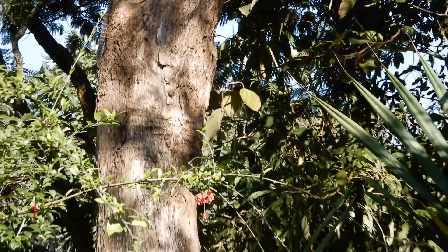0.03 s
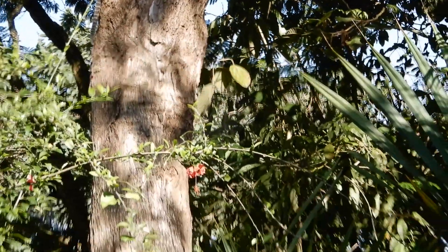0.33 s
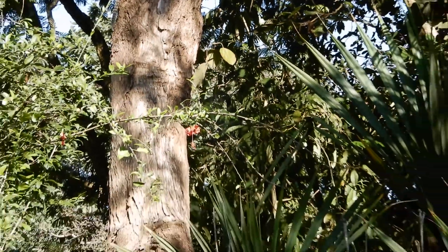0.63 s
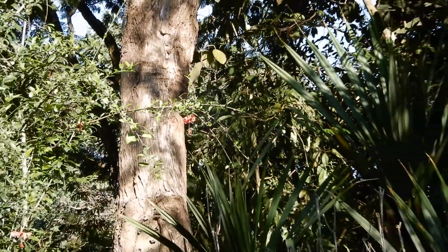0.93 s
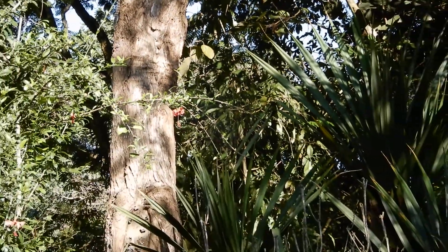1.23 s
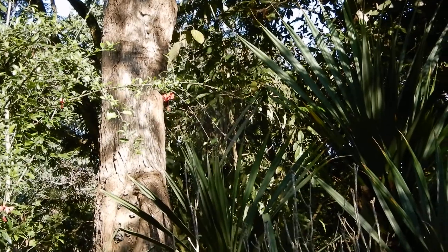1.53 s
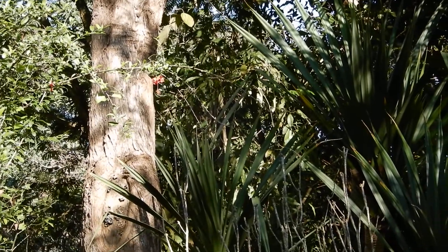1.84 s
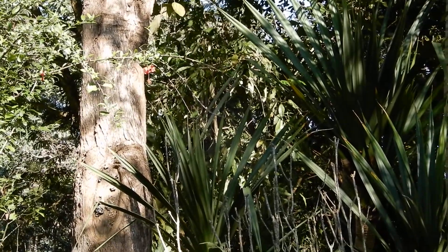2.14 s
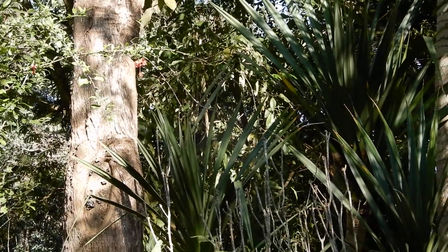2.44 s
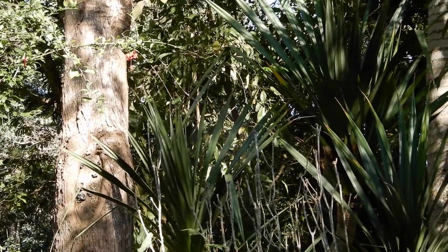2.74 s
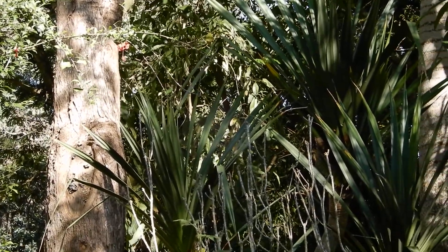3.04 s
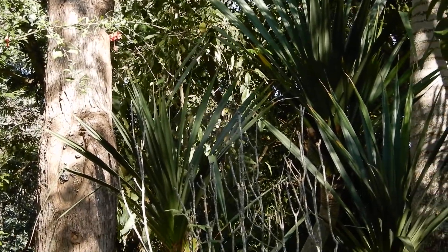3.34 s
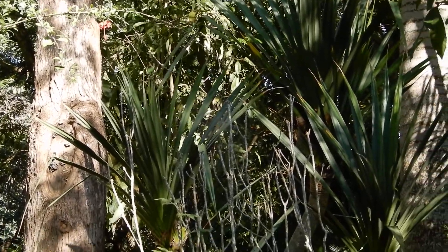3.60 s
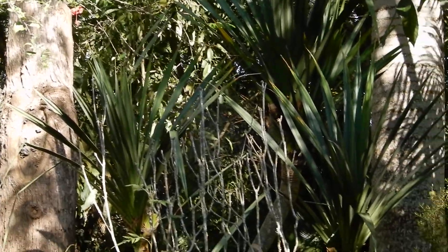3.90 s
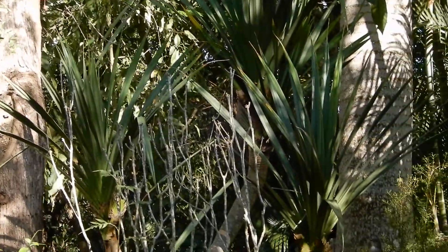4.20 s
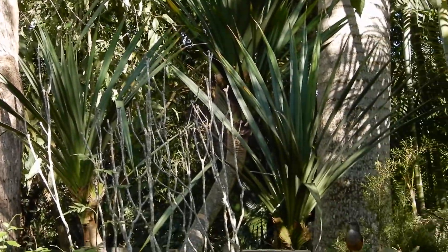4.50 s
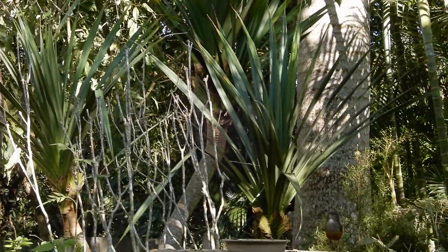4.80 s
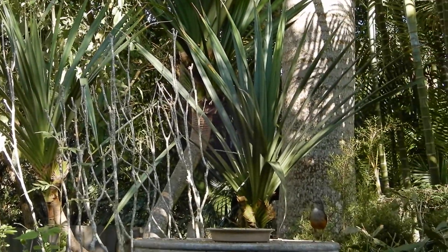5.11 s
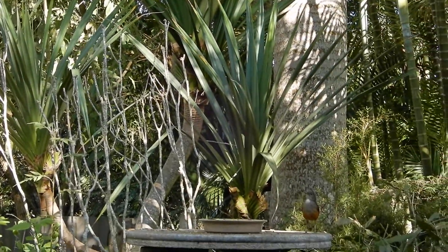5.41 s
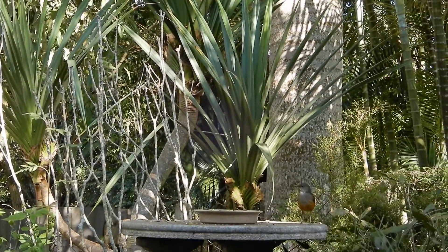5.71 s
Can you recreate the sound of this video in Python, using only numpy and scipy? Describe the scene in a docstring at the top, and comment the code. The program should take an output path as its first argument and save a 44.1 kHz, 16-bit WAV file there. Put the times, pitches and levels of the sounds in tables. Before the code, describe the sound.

Light microphone bumps, then a bird squawks harshly once and later twice, with thin far whistles and soft hoots between.

```python
"""A bird close by, hidden in a leafy garden, gives two soft buzzy notes and three harsh squawks: its
syrinx, forced into a rasp, settles into a falling whistle. Thin wavering whistles and a few low hoots
come from farther off, over a distant rumble and a soft hiss. Early on a hand rubs and knocks the
housing of the stereo microphone."""
import sys
import numpy as np
from scipy import signal
from scipy.fft import rfft, irfft, next_fast_len
from scipy.io import wavfile
from scipy.ndimage import uniform_filter1d, minimum_filter1d

SR = 44100
rng = np.random.default_rng(int(sys.argv[2]) if len(sys.argv) > 2 else 0)


def generate_wav(signal):
    """Clip the signal to [-1, 1] and save it as 16-bit WAV at the path in sys.argv[1]."""
    frames = np.transpose(np.atleast_2d(signal))
    scaled = np.clip(frames, -1, 1) * 32767
    pcm = np.round(scaled).astype(np.int16)
    wavfile.write(sys.argv[1], SR, pcm)


N = 253575
TIME = np.arange(N) / SR

# How alike noise is on the two channels. Each row: frequency in Hz, left-right correlation.
CORRELATION = [(30, 1), (120, 0.84), (1000, 0.83), (2500, 0.72), (5000, 0.78), (12000, 0.13)]
# Lean of background and handling, and of the near bird. Each row: frequency in Hz, left minus right in dB.
NOISE_BALANCE = [(60, -2.5), (130, -2.5), (300, -1.5), (1000, -0.5), (4000, -0.5), (15000, 1.5)]
BIRD_BALANCE = [(2000, -2), (5000, 0.3), (8200, 4.5), (12000, -3.5)]
# Spectra of the noises. Each row: frequency in Hz, relative level in dB.
RUMBLE_COLOUR = [(25, -10), (45, -11.5), (70, 0.5), (100, 3), (170, -5.5), (300, -5), (500, -12),
                 (760, -19), (1000, -15.5), (1350, -30), (2500, -24), (4400, -25.5), (7000, -33.5),
                 (15500, -55.5)]
HISS_COLOUR = [(1600, -9), (2400, -5.5), (3300, -8), (4800, -4), (6500, -3), (9200, -4), (10200, -44),
               (16000, -38.5)]
TICK_COLOUR = [(400, -9), (1400, -17), (2800, 2), (4000, -5.5), (8000, -12), (12000, -15), (16000, -30)]
RUB_COLOUR = [(1300, -21), (2700, -8), (3300, -17), (3700, 5.5), (4200, -15), (6000, -25), (8500, -14),
              (10500, -19), (13000, -27.5), (14200, -28), (16000, -43)]
SCUFF_COLOUR = [(60, -14), (130, 4), (300, 0.5), (600, -13.5), (900, -5.5), (1300, -23.5), (2700, -12.5),
                (4500, -22.5), (9000, -26.5), (15000, -43)]
# The hiss between swells. Each row: time in seconds, relative level in dB.
HISS_FLOOR = [(0, -78), (3.4, -74.5), (4.7, -63), (5.75, -67)]
# Swells of soft high hiss. Each row: start in seconds, length in seconds, relative level in dB.
HISS_SWELLS = [(-.3, 0.63, -57.5), (3.556, 0.4, -61.5), (3.856, 0.52, -56), (4.31, 0.37, -57),
               (4.68, 0.14, -59.5)]
# Specks of sound in the foliage. Each row: start in seconds, level in dB.
LEAF_SPECKS = [(1.282, -52.5), (4.46, -61), (4.53, -59), (5.042, -55)]
# Light strokes and heavier scuffs of the hand on the microphone.
# Each row: start in seconds, length in seconds, relative level in dB.
RUBS = [(-.02, 0.23, -57), (0.421, .75, -54), (1.487, .14, -53)]
SCUFFS = [(0.42, .14, -44), (1.135, 0.041, -45.5), (1.512, 0.092, -44)]
# Knocks on the housing. Each row: start in seconds, thump level in dB, thump pitch in Hz,
# tick level in dB, tick length in seconds.
KNOCKS = [(0.059, -29, 160, -53, 0.0052), (0.724, -25.5, 170, -34.5, 0.0063),
          (0.9883, -21.5, 146, -34.5, 0.012), (1.0373, -31.5, 420, -37.5, 0.0068)]
# The garden's echo. Each row: frequency in Hz, seconds to die away by 60 dB.
GARDEN_T60 = [(500, 0.33), (2000, 0.2), (4200, 0.35), (8000, 0.25), (15000, 0.088)]
# Stereo width of that echo. Each row: frequency in Hz, side minus mid in dB.
ECHO_WIDTH = [(500, 7), (2500, -12), (4500, -11.5), (8000, -1.5), (14000, 5.5)]
# Far calls. Each row: start in seconds, length in seconds, middle pitch in Hz, relative level in dB.
FAR_HOOTS = [(3.82, 0.093, 545, -56.5), (3.93, 0.092, 573, -54), (4.33, .096, 530, -57.5),
             (4.62, .11, 579, -51.5)]
FAR_WHISTLES = [(1.54, .09, 4160, -52.5), (1.63, .09, 4070, -51.5), (1.74, 0.068, 4390, -51.5),
                (1.80, 0.065, 4060, -46), (1.93, 0.095, 4215, -52), (2.04, 0.075, 4050, -50.5),
                (3.36, .11, 4105, -49), (3.62, 0.08, 4300, -56.5), (3.92, 0.097, 4295, -53),
                (3.99, 0.071, 4030, -49), (4.24, 0.071, 4040, -46.5), (4.44, 0.095, 4175, -47),
                (4.54, 0.08, 4000, -48), (4.69, 0.057, 3940, -45)]
# Resonances of the near bird's throat and beak. Each row: centre in Hz, width in Hz, relative level in dB.
THROAT = [(970, 210, -30), (2270, 290, -14.5), (3110, 594, -5), (4210, 830, -2), (5250, 820, 1),
          (6330, 1180, -7), (7960, 1570, -20.5), (10600, 1500, -31.5), (12760, 1100, -33.5),
          (14300, 1500, -43)]
# Its voice cracks. Each row: start in seconds, length in seconds, lowest pitch in Hz, relative level in dB.
CRACKS = [(2.423, 0.016, 2120, -31), (2.463, 0.0098, 2206, -28), (2.485, 0.0057, 2510, -20.5),
          (2.537, 0.0093, 2560, -23.5), (5.397, 0.0072, 2240, -28), (5.422, 0.0088, 2090, -27.5),
          (5.445, 0.0057, 2240, -23.5), (5.496, 0.014, 2387, -29.5)]
# The rasp breaks back into the whistle. Each row: start in seconds, length in seconds, added rasp share.
RELAPSES = [(2.464, .028, 0.39), (5.224, .012, 0.23), (5.419, 0.016, 1), (5.438, 0.02, 0.43)]
# The bird pushes harder for a moment. Each row: start in seconds, length in seconds, extra level in dB.
PUSHES = [(2.293, .008, 5.5), (2.488, 0.014, 4), (2.51, .013, 4), (5.209, .016, 4), (5.234, 0.0073, 8.5),
          (5.283, 0.011, 2.5), (5.408, .012, 5), (5.492, 0.021, 6)]
# The near bird's calls. Each row: start in seconds, length in seconds, relative level in dB, attack in
# seconds, sag of level in dB, opening pitch in Hz, fall in Hz, seconds of rasp, rasp share left (0-1),
# opening chaos (0-1), seconds until full chaos, cycles before the pattern repeats, second and third
# partials in dB, tilt of the rasp in dB per octave.
SQUAWKS = [(2.237, .104, -39.5, .016, -6, 4260, 130, 0.051, 0.07, 0.2, .15, 2, -24.5, -33, -4.5),
           (2.339, .05, -37, 0.0034, -0.5, 4240, 200, .018, 0.4, .6, 0.022, 2, -24, -26, -6.5),
           (2.393, 0.16, -11.5, 0.013, 3, 4312, 419.5, 0.058, 0.02, .26, .055, 4, -25.5, -48, 0.5),
           (5.147, .17, -17.5, 0.065, 3, 4304, 370.5, .06, .06, .8, 0.031, 4, -31, -29.5, 2.5),
           (5.353, 0.15, -10.5, 0.035, 9, 4246, 419.5, 0.058, 0.11, 0.79, 0.028, 4, -19.5, -32, 1.5)]


def from_db(db):
    """Decibels to gain."""
    return 10 ** (np.asarray(db) / 20)


def rms_one(x):
    """Scale to unit power."""
    return x / np.sqrt(np.mean(x ** 2) + 1e-20)


def at_hz(points, hz):
    """Read a curve on a log-frequency axis."""
    f, value = np.transpose(points)
    return np.interp(np.log(np.maximum(hz, 1)), np.log(f), value)


def colour(x, gain):
    """Filter by a gain that is a function of frequency."""
    size = next_fast_len(N + 4096)
    hz = np.arange(size // 2 + 1) * SR / size
    return irfft(rfft(x, size) * gain(hz), size)[..., :N]


def panned(x, balance):
    """Lean a sound left or right, band by band."""
    return colour(x, lambda f: from_db(at_hz(balance, f) * np.array([[.5], [-.5]])))


def drift(rate):
    """Random wander of rms 1, with `rate` new values a second."""
    knots = rng.standard_normal(N // 16)
    return rms_one(np.interp(TIME * rate, np.arange(len(knots)), knots))


def stereo_noise(spectrum):
    """Coloured noise of rms 1, more alike on both channels in the bass."""
    mid, side = rng.standard_normal((2, N))
    mid = colour(mid, lambda f: np.sqrt(1 + at_hz(CORRELATION, f)))
    side = colour(side, lambda f: np.sqrt(1 - at_hz(CORRELATION, f)))
    pair = np.array([mid + side, mid - side])
    return rms_one(colour(pair, lambda f: from_db(at_hz(spectrum, f))))


def swell(start, length):
    """A rounded rise and fall."""
    return np.sqrt(np.sin(np.pi * np.clip((TIME - start) / length, 0, 1)).clip(0))


def plateau(start, length, edge_s):
    """Rise, hold and fall, with straight edges."""
    return np.clip(np.minimum(TIME - start, start + length - TIME) / edge_s, 0, 1)


def swells_within(rows, start, end):
    """Sum of the brief swells that begin during a call."""
    return sum(size * swell(s, length) for s, length, size in rows if start < s < end)


def phase_of(hz):
    """Running phase of an oscillator."""
    return 2 * np.pi * np.cumsum(hz) / SR


def background(rumble_db=-47.5, hiss_db=-1, rustle_db=1.5, speck_s=0.0035):
    """Distant rumble, with a soft uneven hiss and a few specks from the leaves."""
    rumble = from_db(rumble_db) * stereo_noise(RUMBLE_COLOUR)
    swells = sum(from_db(db) * swell(s, length) for s, length, db in HISS_SWELLS)
    floor = from_db(np.interp(TIME, *np.transpose(HISS_FLOOR)))
    rustle = from_db(hiss_db + rustle_db * (drift(30) + drift(300)))
    hiss = np.maximum(swells, floor) * rustle * stereo_noise(HISS_COLOUR)
    specks = sum(from_db(db) * swell(s, speck_s) for s, db in LEAF_SPECKS)
    return rumble + hiss + specks * stereo_noise(TICK_COLOUR)


def hand_rubs(edge_s=0.018, grip_db=-67, let_go_s=1.62, grain_db=1.14):
    """Skin slides over the microphone housing in tiny slips, exciting its one sharp resonance."""
    strokes = sum(from_db(db) * plateau(s, length, edge_s) for s, length, db in RUBS)
    grip = from_db(grip_db) * np.clip((let_go_s - TIME) / edge_s, 0, 1)   # faint creep between strokes
    rub = np.maximum(strokes, grip) * stereo_noise(RUB_COLOUR)
    scuffs = sum(from_db(db) * swell(s, length) for s, length, db in SCUFFS) * stereo_noise(SCUFF_COLOUR)
    return (rub + scuffs) * from_db(grain_db * drift(250))


def hand_knocks(thump_cycles=0.34):
    """Each knock on the housing is a dry tick and a thump that swings once or twice, right of centre."""
    thumps, ticks = 0, 0
    for start, thump_db, thump_hz, tick_db, tick_s in KNOCKS:
        cycle = np.clip((TIME - start - tick_s / 6) * thump_hz, -5, 5)
        thumps += from_db(thump_db) * np.cos(2 * np.pi * cycle) * np.exp(-(cycle / thump_cycles) ** 2)
        age = np.clip(TIME - start, 0, .2)
        ticks += from_db(tick_db) * (age > 0) * np.exp(-(age / tick_s * 2) ** 2)
    return (thumps + ticks * stereo_noise(TICK_COLOUR)) * from_db([[-2], [2]])


def garden(x, leaves_db, trees_db, leaves_s=0.037, late_db=-17, late_s=0.75, build_s=0.024):
    """Trunks and leaves close by scatter at once; the farther trees give a thin, longer tail."""
    def left_right(mid, side):
        side = colour(side, lambda f: from_db(at_hz(ECHO_WIDTH, f)))[:SR]
        return np.array([mid + side, mid - side])

    def unit_energy(echo):
        return echo / np.sqrt(np.sum(echo.mean(axis=0) ** 2))

    t = TIME[:SR]
    reflections = rng.standard_normal((2, SR)) * (rng.random((2, SR)) < .02)
    leaves = left_right(*reflections) * np.exp(-t / leaves_s) * (t > .002)
    diffuse = left_right(*rng.standard_normal((2, SR)))
    trees = diffuse * from_db(late_db) * 0.0013 ** (t / late_s)
    edges_hz = np.geomspace(300, 16000, 9)
    for low, high in zip(edges_hz, edges_hz[1:]):
        band = signal.sosfilt(signal.butter(2, [low, high], "band", fs=SR, output="sos"), diffuse)
        trees += band * 1e-3 ** (t / at_hz(GARDEN_T60, np.sqrt(low * high)))
    trees *= np.minimum(t / build_s, 1)
    echo = from_db(leaves_db) * unit_energy(leaves) + from_db(trees_db) * unit_energy(trees)
    return x + signal.fftconvolve(x[None], echo, axes=1)[:, :N]


def far_calls(notes, glide_hz_per_s, waver, waver_rate, flutter_db):
    """Whistles or hoots from farther off: single gliding tones with an unsteady pitch."""
    unsteady, out = 1 + waver * drift(waver_rate), 0
    for start, length, middle_hz, level_db in notes:
        pitch = middle_hz + glide_hz_per_s * (np.clip(TIME - start, 0, length) - length / 2)
        out += from_db(level_db) * swell(start, length) * np.sin(phase_of(pitch * unsteady))
    return out * from_db(flutter_db * drift(70))


def voice_cracks(top_hz=3900, fall_s=0.0013, waver=0.037):
    """For a few milliseconds the near bird's syrinx drops into a lower, unsteady register."""
    unsteady, out = 1 + waver * drift(1200), 0
    for start, length, low_hz, level_db in CRACKS:
        pitch = low_hz + (top_hz - low_hz) * np.exp(-np.clip(TIME - start, 0, length) / fall_s)
        out += from_db(level_db) * swell(start, length) * np.sin(phase_of(pitch * unsteady))
    return out


def beak(buzz, start, tilt_db, open_ratio=0.96, shut_ratio=0.91, closing_s=0.12):
    """The beak gapes at first and then closes, so its resonances sink during a call."""
    def resonances(f):
        powers = (from_db(db + tilt_db * np.log2(hz)) ** 2 / (1 + ((f - hz) / width) ** 2) ** 4
                  for hz, width, db in THROAT)
        return np.sqrt(sum(powers))

    wide = rms_one(colour(buzz, lambda f: resonances(f / open_ratio)))
    narrow = rms_one(colour(buzz, lambda f: resonances(f / shut_ratio)))
    gape = np.exp(-np.maximum(TIME - start, 0) / closing_s)
    return rms_one(gape * wide + (1 - gape) * narrow)


def breath(age, length, level_db, attack_s, sag_db, start_hz, fall_hz, rasp_s, rasp_left, first_chaos,
           orderly_s, onset_db=-14.5, release_db=-7.5, release_s=0.018, full_rasp=0.91, full_chaos=.85):
    """Pitch, level, rasp and chaos through one call, as the syrinx flips from regime to regime."""
    def after(s, switch_s=0.0062):
        return .5 + .5 * np.tanh((age - s) / switch_s)

    done = np.clip(age / length, 0, 1)
    pitch = start_hz - fall_hz * done ** 2.3   # holds, then drops ever faster as the breath runs out
    onset = onset_db * np.clip(1 - age / attack_s, 0, 1)
    release = release_db * np.clip(1 + (age - length) / release_s, 0, 1)
    rasp = full_rasp + (rasp_left - full_rasp) * after(rasp_s)
    chaos = first_chaos + (full_chaos - first_chaos) * after(orderly_s)
    return pitch, level_db - sag_db * done + onset + release, rasp, chaos


def squawk(call, waver=.015, wander=.26, jitter=.075, flutter_db=2, grain_db=3.5, turbulence_db=1,
           throb_db=2, edge_s=0.0021):
    """The syrinx whistles; forced, it repeats only every few cycles, and that breaks up into chaos."""
    start, length, *shape, cycles, second_db, third_db, tilt_db = call
    end = start + length
    pitch, level_db, rasp, chaos = breath(TIME - start, length, *shape)
    rasp = np.clip(rasp + swells_within(RELAPSES, start, end), 0, 1)
    level_db += swells_within(PUSHES, start, end)
    pitch *= 1 + waver * drift(900)
    phase = phase_of(pitch)
    whistle = sum(from_db(db) * np.sin(k * phase) for k, db in enumerate((0, second_db, third_db), 1))
    whistle = rms_one(whistle * from_db(flutter_db * drift(220)))
    # the repeating pattern puts sidebands round the whistle; chaos makes both lurch about
    centre = phase_of(pitch * (1 + jitter * chaos * drift(700)))
    pattern = phase_of(pitch / cycles * (1 + wander * chaos * drift(200)))
    on = (TIME > start) & (TIME < end + edge_s)
    buzz = np.zeros(N)
    buzz[on] = sum(np.sin(centre[on] + k * pattern[on] + 2 * np.pi * rng.random())
                   for k in range(1 - cycles, 3 * cycles))
    turbulence = from_db(turbulence_db) * np.sqrt(chaos) * on * rng.standard_normal(N)
    buzz = buzz * from_db(grain_db * drift(900)) + turbulence
    buzz = beak(buzz, start, tilt_db) * np.sqrt(on.mean())   # unit power within the call
    gate = np.clip((TIME - start) / edge_s * 2, 0, 1) * np.clip((end - TIME) / edge_s + 1, 0, 1)
    level_db += throb_db * chaos * np.tanh(drift(220))
    return gate * from_db(level_db) * (np.sqrt(1 - rasp) * whistle + np.sqrt(rasp) * buzz)


def scene():
    """The near bird reaches the microphone mostly direct; the far whistles scatter through the trees."""
    bird = sum(squawk(call) for call in SQUAWKS) + voice_cracks()
    bird = from_db(-2.5) * garden(bird, leaves_db=-9.5, trees_db=-14)
    whistles = far_calls(FAR_WHISTLES, glide_hz_per_s=-2400, waver=.028, waver_rate=230, flutter_db=1.5)
    whistles = from_db(-8) * garden(whistles, leaves_db=3, trees_db=5)
    hoots = far_calls(FAR_HOOTS, glide_hz_per_s=550, waver=0.0162, waver_rate=60, flutter_db=3.5)
    hoots = garden(hoots, leaves_db=-19, trees_db=-18)
    noises = background() + hand_rubs() + hand_knocks()
    return panned(noises, NOISE_BALANCE) + hoots + whistles + panned(bird, BIRD_BALANCE)


def record(dry, ceiling=0.49, low_cut_hz=48, high_cut_hz=15750):
    """At the recorder: a low cut, a fast limiter on the highest peaks and a steep cut at the top."""
    dry = signal.sosfilt(signal.butter(2, low_cut_hz, "high", fs=SR, output="sos"), dry)
    peak = -minimum_filter1d(-np.abs(dry).max(axis=0), size=88)   # running maximum over 2 ms
    peak = uniform_filter1d(peak, size=88)
    limited = dry / (1 + (peak / ceiling) ** 6) ** (1 / 6)
    return signal.sosfilt(signal.ellip(12, .1, 90, high_cut_hz, fs=SR, output="sos"), limited)


dry = scene()
out = record(dry)
generate_wav(out)
```